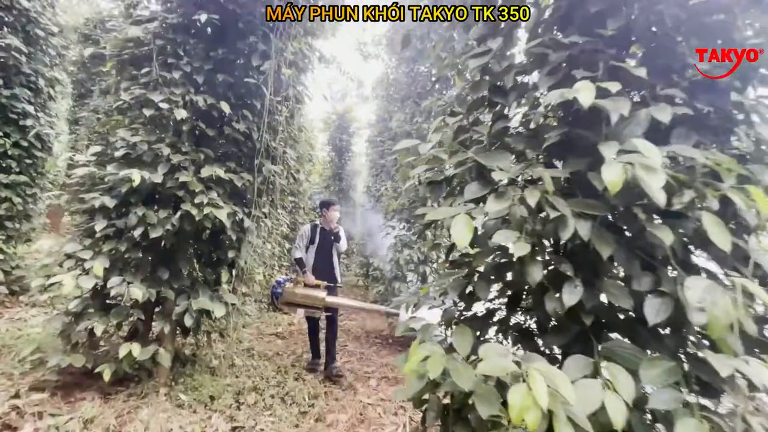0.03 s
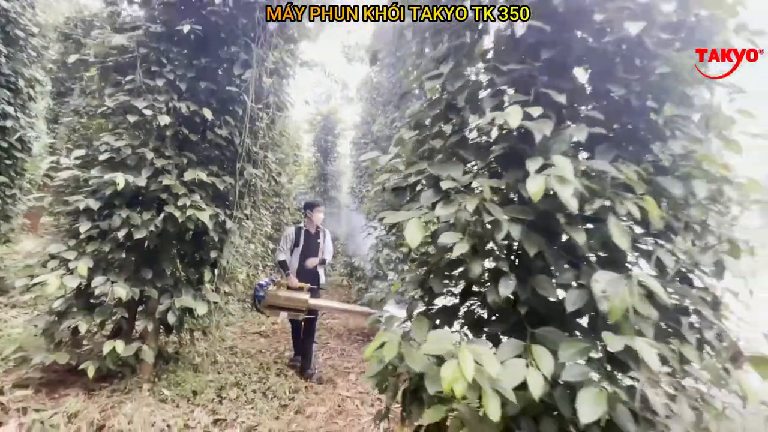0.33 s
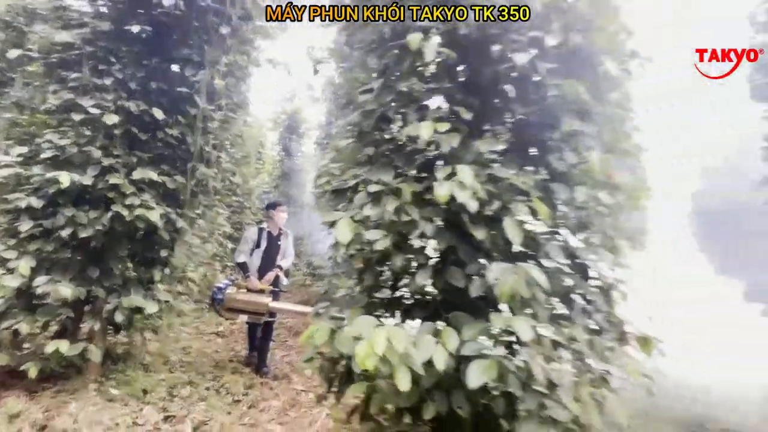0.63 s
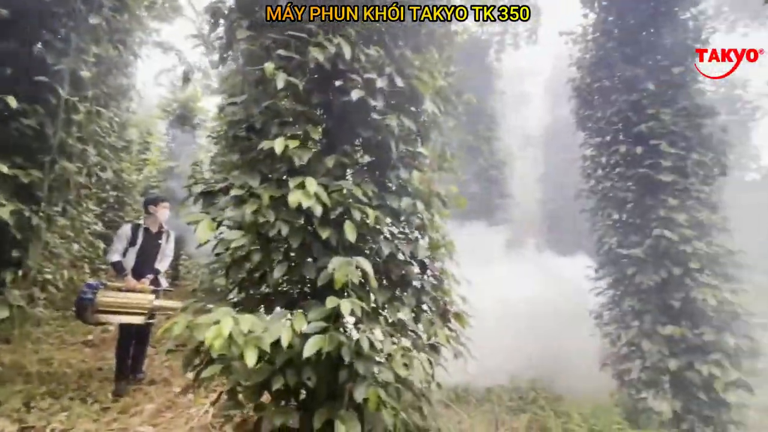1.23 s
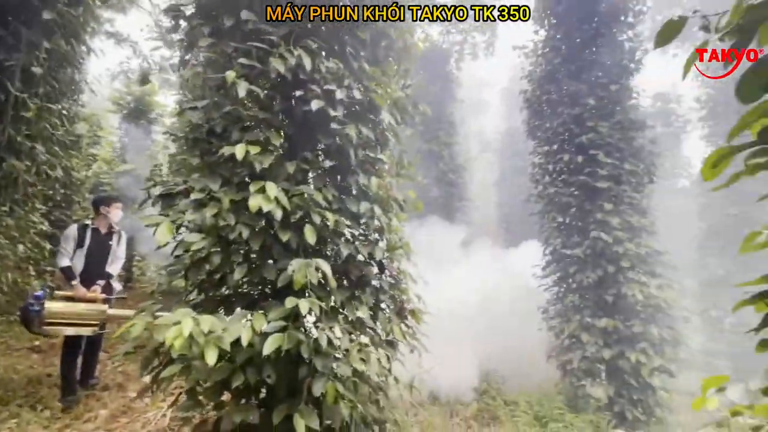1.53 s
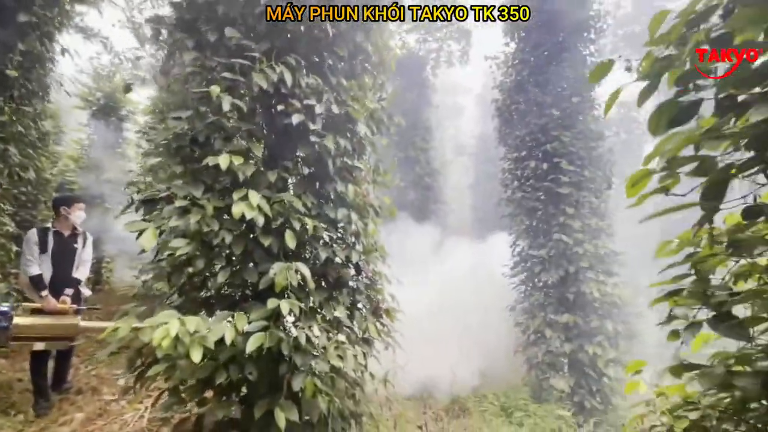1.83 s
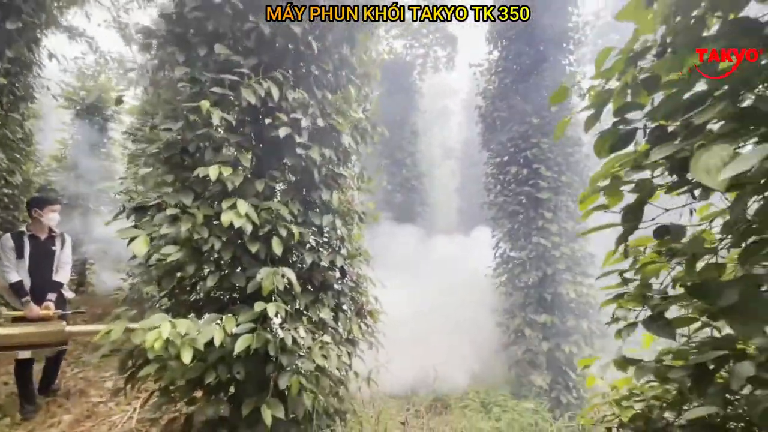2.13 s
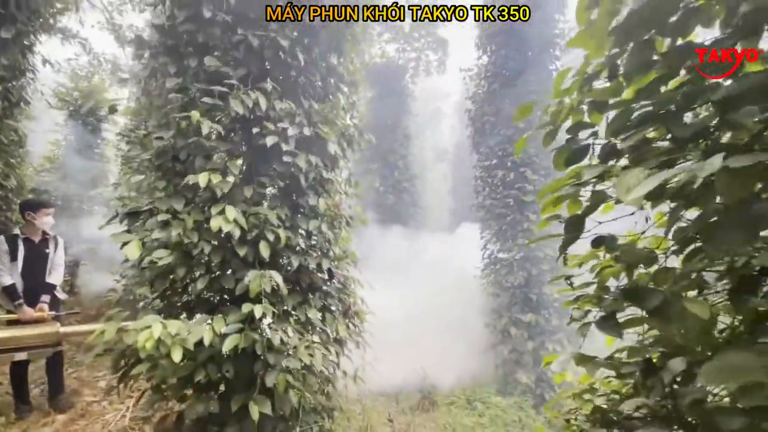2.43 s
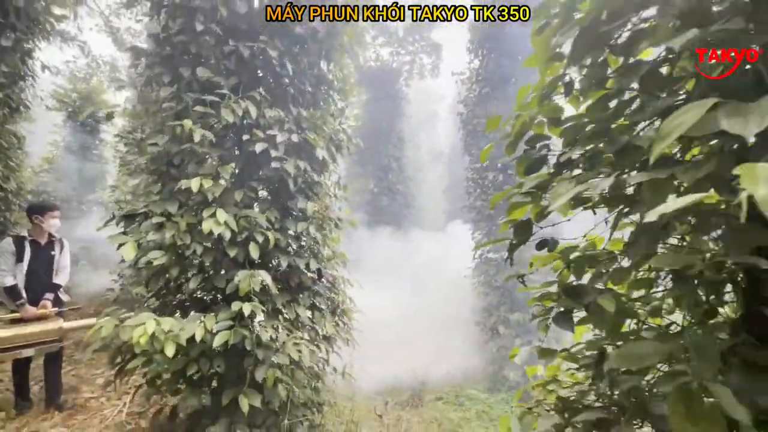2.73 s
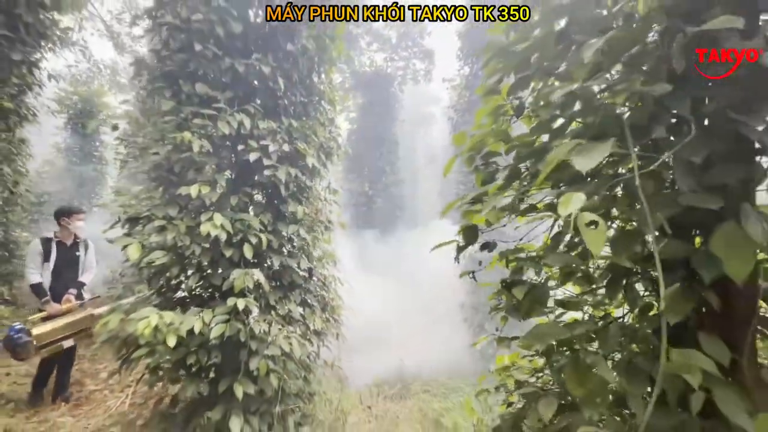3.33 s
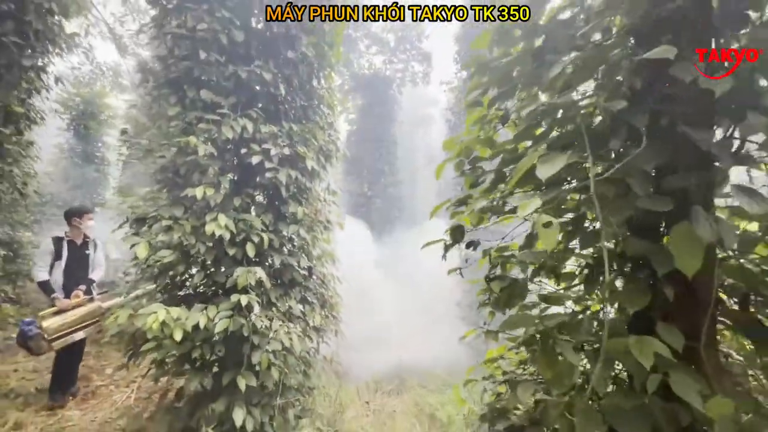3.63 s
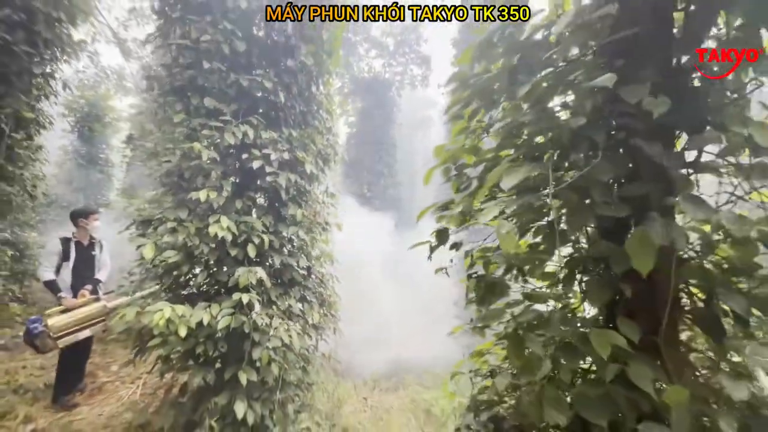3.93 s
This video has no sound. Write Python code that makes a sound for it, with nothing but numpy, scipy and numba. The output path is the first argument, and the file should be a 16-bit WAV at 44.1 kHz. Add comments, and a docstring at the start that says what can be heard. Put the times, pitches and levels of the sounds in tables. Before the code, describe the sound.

A petrol fogging machine drones without a break a few metres away, outdoors among tall plants. Its low, rasping buzz shifts in tone as the microphone moves past, with a faint hiss of spray behind it.

```python
"""Pulse-jet fogger among vines.

The machine drones a few metres away as the listener walks past. Its pipe swings at about 115 Hz.
Each firing adds a bark, a rasp of burning gas and a puff of jet noise, and rings the upper pipe modes.
Spray hisses behind. The bark changes colour as the machine turns and moves to the left."""
import sys
import numpy as np
from scipy import signal
from scipy.fft import rfft, irfft
from scipy.io import wavfile
from scipy.ndimage import uniform_filter1d, map_coordinates
from numba import njit

SR = 44100
rng = np.random.default_rng(int(sys.argv[2]) if len(sys.argv) > 2 else 0)


def waveform_to_disk(signal):
    """Save audio, clipped to [-1, 1], as 16-bit WAV at the path in sys.argv[1]."""
    frames = np.transpose(np.atleast_2d(signal))
    scaled = np.clip(frames, -1, 1) * 32767
    samples = np.round(scaled).astype(np.int16)
    wavfile.write(sys.argv[1], SR, samples)


N = 176400

# Firing rate. Each row: time in seconds, rate in Hz.
FIRING_HZ = [(0, 115.6), (.28, 115.4), (.38, 114.7), (.6, 115), (.97, 114), (1.25, 113.4), (1.38, 115.2),
             (1.9, 113.1), (2.08, 116), (2.18, 114.4), (2.25, 116.9), (2.44, 113.9), (2.56, 114.2),
             (2.68, 116.8), (3.25, 116.2), (3.37, 117.9), (3.5, 116.4), (4, 117.3)]
# Source levels. Each row: time in seconds, then pipe tone, bark and jet gains in dB.
LEVELS_DB = [(0, -9.5, -7, 2), (.35, -11, -7, 2.5), (.75, -10.5, -8, 1), (1.2, -11.5, -2.5, 1.5),
             (1.75, -11.5, 1.5, 0.5), (2.3, -12.5, 0.5, 0.3), (2.8, -12.5, 3, -0.5), (3.3, -14.5, 0.3, -1),
             (4, -14.5, 2.5, -1.5)]
# Right-ear lag of tone and bark. Each row: time in seconds, delay in ms.
EAR_LAG_MS = [(0, 0.052), (.7, 0.17), (1.3, 0.44), (2.2, 0.44), (4, 0.54)]
# Balance of jet and modes. Each row: time in seconds, left minus right in dB.
PAN_DB = [(0, -2), (.7, -1), (1.3, 1), (2, 0.5), (2.6, 0.5), (3.2, 0.5), (4, -0.5)]
# Ground echo. Each row: time in seconds, delay in ms.
GROUND_MS = [(0, 1.55), (.8, 1.09), (1.2, 1.27), (1.9, 1.06), (2.25, 1.2), (2.6, 1.13), (2.85, 1.536),
             (4, 1.28)]

# Spray and jet spectra. Each row: frequency in Hz, left and right gains in dB.
SPRAY_DB = [(30, -105, -105), (1510, -81.5, -80), (4050, -83.5, -97), (4840, -77, -105), (6800, -80, -109),
            (7800, -85, -88), (9100, -103, -106), (13000, -120, -120)]
JET_DB = [(30, -105, -105), (254, -77.5, -85.5), (434, -57.5, -57.5), (492, -66, -77.5),
          (894, -60.5, -64.5), (1230, -66, -66.5), (1340, -73, -79.5), (2110, -69.5, -69.5),
          (3040, -74, -81.5), (4020, -80, -83.5), (6000, -94, -86.5), (8800, -91, -102),
          (10400, -112, -114)]
# Top hiss, pipe rumble and bark spectra. Each row: frequency in Hz, gain in dB.
SIZZLE_DB = [(6000, -115), (8200, -90), (9300, -81.5), (10600, -82.5), (11600, -82.5), (12500, -101),
             (13500, -110)]
RUMBLE_DB = [(20, -82), (45, -97), (56, -92), (67, -54.5), (80, -84), (100, -59.5), (135, -58.5),
             (160, -62.5), (190, -70), (300, -73.5), (600, -111)]
BARK_DB = [(30, -90), (100, -66), (170, -24), (230, -29.5), (290, -52), (345, -36.5), (455, -20),
           (515, -26.5), (580, -15.5), (695, -18.5), (810, -22), (920, -33), (1040, -35.5), (1300, -41.5),
           (1420, -43.5), (1850, -62), (3000, -72.5), (6000, -95)]
# Bark colour at the right ear. Each row: frequency in Hz, gain over the left in dB.
SHADE_DB = [(230, -0.5), (350, 3.5), (460, -2), (580, -7.5), (700, -9.5), (810, -7), (920, 1), (1100, -10),
            (1800, 4.5), (4000, 6.5)]

# Upper pipe modes. Each row: centre in Hz, nominal width in Hz, left and right gains in dB.
PIPE_MODES_HZ_DB = [(1241, 93, -56.5, -66), (1524, 68, -62.5, -63), (1812, 68, -63, -65),
                    (2112, 39, -59.5, -68.5), (2433, 43, -72, -64), (2696, 52, -71, -70),
                    (3280, 230, -79, -80)]
# All modes together. Each row: time in seconds, gain in dB.
RING_DB = [(0, -1), (.35, 4.5), (.75, 7), (1.3, 1), (1.7, -3.5), (2.45, -1.5), (2.8, -4.5), (4, -4)]
# Rasp resonance. Each row: time in seconds, centre in Hz, level in dB.
RASP_HZ_DB = [(0, 694, -24), (.5, 708, -24), (1, 710, -23), (1.4, 746.2, -28), (1.9, 788.8, -27),
              (2.5, 726, -32), (2.95, 614, -27.5), (3.5, 627, -25.5), (4, 634, -26)]
# Harder firings. Each row: time in seconds, rasp boost in dB.
SPITS_DB = [(.406, 11.5), (.44, 2), (.48, 8)]

# Swelling and fading bands, named by centre in Hz. Each row: time in seconds, gain in dB.
RING_2030_DB = [(0, 1), (.2, 5), (.55, -6), (1, -11), (1.8, -1), (2.5, 3), (2.9, 2), (3.3, 0.5), (3.7, 8),
                (4, 8)]
JET_1960_DB = [(0, 3.5), (.3, 2), (.7, 6), (1.2, 0), (1.9, -4), (2.4, 1), (3, -1), (4, 1.5)]
NASAL_1220_DB = [(0, -0.5), (1, -1), (1.45, -3), (1.68, 6.5), (1.8, 4), (2, 3), (2.52, 0.5), (2.6, -10),
                 (3.1, 4), (3.3, 0), (4, 0)]
NASAL_1590_DB = [(0, 0), (.7, -1.5), (1.45, 1.5), (1.65, 7), (2.1, 5.5), (2.4, 4), (2.8, 1), (3, 7.5),
                 (3.3, 6.5), (3.65, -8), (4, 2)]
BARK_345_DB = [(0, 3), (0.7, -5), (1.1, 5), (1.7, 1), (2.5, -2), (4, -2)]
BARK_460_DB = [(0, 6), (.2, 6), (.65, -0.5), (1.2, 2.5), (1.85, -5.5), (2.15, -2), (2.6, -2.5), (3, 3),
               (3.45, -1), (3.9, 2.5)]
BARK_580_DB = [(0, 0), (.7, -1), (1.15, -4), (1.42, 0.5), (2.5, -1), (3.1, 1.5), (3.3, -2), (3.55, 1),
               (4, 2.5)]
BARK_690_DB = [(0, 2.5), (0.699, 5.5), (1, 2.5), (1.25, -11), (1.95, -33), (2.3, -11.5), (2.7, -9),
               (2.999, -13.5), (3.2, 2), (3.4, 4.5), (3.7, 0.5), (3.85, -6), (4, -0.5)]
BARK_920_DB = [(0, 8.5), (.6, 16.5), (1, 10.5), (1.4, -6), (1.8, -19), (1.95, 1), (2.5, 1.5), (2.67, -15),
               (3.02, 6), (3.3, -4), (3.8, -10), (4, -10)]
BARK_1040_DB = [(0, 12), (.6, 9), (1.5, 0), (2, 7.5), (2.45, 2), (2.65, -19), (3.05, 5.5), (3.3, 4),
                (3.7, 9.5), (4, 7.5)]
BARK_1150_DB = [(0, -5), (.8, -2.5), (1.45, 5), (1.68, 10.5), (2.52, 10.5), (2.6, 1), (4, -16)]


def undb(db):
    """Decibels to gain."""
    return 10 ** (np.asarray(db) / 20)


def curve(table, column=1):
    """Table column, linear in time."""
    rows = np.array(table, float)
    return np.interp(np.arange(N) / SR, rows[:, 0], rows[:, column])


def bin_gains(table, column=1):
    """Gain per FFT bin from a dB spectrum, on a log frequency axis."""
    rows = np.array(table, float)
    hz = np.maximum(np.arange(N + 1) * SR / (2 * N), 1)
    return undb(np.interp(np.log(hz), np.log(rows[:, 0]), rows[:, column]))


def colour(x, table, column=1):
    """Minimum-phase filter from a dB spectrum."""
    cepstrum = irfft(np.log(bin_gains(table, column)))
    cepstrum[1:N] *= 2
    cepstrum[N + 1:] = 0
    return irfft(rfft(x, 2 * N) * np.exp(rfft(cepstrum)))[:N]


def noise():
    """White noise at 0 dB per Hz."""
    return rng.standard_normal(N) * np.sqrt(SR / 2)


def wander(rate_hz):
    """Random steps, smoothed twice; unit spread."""
    hold = int(SR / rate_hz)
    steps = np.repeat(rng.standard_normal(N)[:N // hold + 1], hold)
    smooth = uniform_filter1d(uniform_filter1d(steps, hold), hold)[:N]
    return smooth / smooth.std()


def flicker(spread_db, rate_hz):
    """Random gain around unity."""
    return undb(spread_db * wander(rate_hz))


def delay(x, ms):
    """Constant or moving delay."""
    return map_coordinates(x, [np.arange(N) - ms * SR / 1000], mode="mirror")


def swell_band(x, centre_hz, table, half_width_hz):
    """Moving gain on one flat-topped band."""
    hz = np.arange(N + 1) * SR / (2 * N)
    window = np.exp(-((hz - centre_hz) / half_width_hz) ** 4)
    band = irfft(rfft(x, 2 * N) * window)[:N]
    return x + (undb(curve(table)) - 1) * band


@njit
def bandpass(x, centre_hz, width_hz):
    """State-variable band-pass with a moving centre."""
    y, band_state, low_state = np.empty(len(x)), 0., 0.
    for i in range(len(x)):
        g, damping = np.tan(np.pi * centre_hz[i] / SR), width_hz / centre_hz[i]
        band = (band_state + g * (x[i] - low_state)) / (1 + g * (g + damping))
        band_state = 2 * band - band_state
        low_state += 2 * g * band
        y[i] = damping * band
    return y


def resonance(x, centre_hz, stage_width_hz):
    """Two band-passes in series."""
    return bandpass(bandpass(x, centre_hz, stage_width_hz), centre_hz, stage_width_hz)


def gas_flow(cycles, floor=.55, decay_cycles=.25, scatter_db=1.2):
    """Flow jumps at each firing and decays towards a floor; unit rms."""
    size = undb(scatter_db * rng.standard_normal(N))[cycles.astype(int)]
    flow = floor + size * np.exp(-(cycles % 1) / decay_cycles)
    return flow / np.sqrt(np.mean(flow ** 2))


def firings(cycles, jitter_ms=.04, scatter_db=.75):
    """One slightly uneven pressure pulse per cycle; harmonics near amplitude 1."""
    position = np.interp(np.arange(1, int(cycles[-1]) + 1), cycles, np.arange(N))
    jitter, scatter = rng.standard_normal((N, 2))[:len(position)].T
    position = np.clip(position + jitter * jitter_ms * SR / 1000, 0, N - 2)
    size = undb(scatter_db * scatter) * N / cycles[-1] / 2
    sample, fraction = position.astype(int), position % 1
    return np.bincount(sample, size * (1 - fraction), N) + np.bincount(sample + 1, size * fraction, N)


def spray():
    """Flickering spray hiss, plus a thin top hiss that reaches the right ear first."""
    hiss = np.array([colour(noise(), SPRAY_DB, column) for column in (1, 2)])
    hiss *= flicker(spread_db=.8, rate_hz=20)
    sizzle = colour(noise(), SIZZLE_DB) * flicker(spread_db=.4, rate_hz=12)
    hiss += np.array([delay(sizzle, ms=.2484), sizzle])
    return hiss * undb(1.13 * curve(LEVELS_DB, column=3))  # follows the jet


def ground_echo(ears, gain_db=-15):
    """One ground reflection with a moving delay."""
    return undb(gain_db) * np.array([delay(x, curve(GROUND_MS)) for x in ears])


def pipe_ring(cycles, pulses, pulse_db=-1):
    """Firings and gas noise ring the upper pipe modes; each fades in and out a little."""
    flow, ears = gas_flow(cycles), np.zeros((2, N))
    blows = undb(pulse_db) * pulses / pulses.std() * np.sqrt(SR / 2)
    for hz, width_hz, left_db, right_db in PIPE_MODES_HZ_DB:
        common = flow * noise() + blows
        for ear, db in enumerate((left_db, right_db)):
            drive = .5 * (common + flow * noise())
            mode = resonance(drive, np.full(N, float(hz)), stage_width_hz=1.65 * width_hz)
            ears[ear] += mode * undb(db) * flicker(spread_db=.7, rate_hz=3.1)
    left, right = (swell_band(x, 2030, RING_2030_DB, half_width_hz=180) for x in ears)
    return np.array([left, delay(right, ms=.21)]) * undb(curve(RING_DB))


def jet(cycles, shared_power=.41):
    """Pulsing exhaust noise, partly scattered by leaves, so the ears share only some of it."""
    flow = gas_flow(cycles) * flicker(spread_db=.9, rate_hz=40)
    common = np.sqrt(shared_power) * noise()
    ears = [flow * (common + np.sqrt(1 - shared_power) * noise()) for _ in range(2)]
    left, right = (swell_band(x, 1960, JET_1960_DB, half_width_hz=320) for x in ears)
    left, right = colour(left, JET_DB), colour(delay(right, ms=.26), JET_DB, column=2)
    return np.array([left, right]) * undb(curve(LEVELS_DB, column=3))


def nasal(x):
    """Two nasal bands of the exhaust stand out midway, then drop back."""
    x = swell_band(x, 1220, NASAL_1220_DB, half_width_hz=106)
    return swell_band(x, 1590, NASAL_1590_DB, half_width_hz=106)


def rasp(cycles, spit_s=.00542, right_db=-1):
    """Bursts of burning gas excite a broad, wandering resonance; a few firings spit harder."""
    bursts = noise() * gas_flow(cycles, floor=.51)
    burn = resonance(bursts, curve(RASP_HZ_DB), stage_width_hz=141.)
    time_s = np.arange(N) / SR
    spit_db = sum(db * np.exp(-((time_s - at_s) / spit_s) ** 2) for at_s, db in SPITS_DB)
    left = burn / burn.std() * undb(curve(RASP_HZ_DB, column=2) + spit_db)
    return np.array([left, undb(right_db) * delay(left, ms=.4)])


def bark(pulses, crest_delay_ms=1.296):
    """Each firing leaves the pipe as a sharp, symmetric pressure crest; narrow bands swell and fade."""
    crests = irfft(rfft(pulses, 2 * N) * bin_gains(BARK_DB))[:N]
    left = delay(crests, crest_delay_ms) * undb(curve(LEVELS_DB, column=2))
    for hz, table in ((345, BARK_345_DB), (460, BARK_460_DB), (580, BARK_580_DB), (690, BARK_690_DB),
                      (920, BARK_920_DB), (1040, BARK_1040_DB), (1150, BARK_1150_DB)):
        left = swell_band(left, hz, table, half_width_hz=22)
    return np.array([left, delay(colour(left, SHADE_DB), curve(EAR_LAG_MS))])


def pipe_tone(cycles, crest_lag_cycles=.3, right_db=.28):
    """The air column swings as a near sine, cresting after each firing, over a low rumble."""
    level_db = curve(LEVELS_DB)
    swing = np.cos(2 * np.pi * (cycles - crest_lag_cycles))
    tone = swing * undb(level_db) * flicker(spread_db=.06, rate_hz=26.4)
    rumble = colour(noise(), RUMBLE_DB) * undb(level_db - level_db.mean())
    left = tone + rumble
    return np.array([left, undb(right_db) * delay(left, curve(EAR_LAG_MS))])


def scene():
    """One wavering firing cycle drives all but spray and rumble; the ground mirrors jet and ring."""
    rate_hz = curve(FIRING_HZ) * (1 + .008 * wander(rate_hz=85))
    cycles = np.cumsum(rate_hz) / SR
    pulses = firings(cycles)
    pan_db = np.array([curve(PAN_DB), -curve(PAN_DB)]) / 2
    combustion = (bark(pulses) + rasp(cycles)) * undb(.46 * pan_db)
    exhaust = np.array([nasal(x) for x in jet(cycles) + pipe_ring(cycles, pulses)])
    exhaust *= undb(pan_db) * flicker(spread_db=.55, rate_hz=17)
    return pipe_tone(cycles) + combustion + exhaust + ground_echo(exhaust) + spray()


def record(dry):
    """Steep low-pass on the top treble."""
    cutoff_hz = 12700
    return signal.sosfilt(signal.ellip(8, .2, 70, cutoff_hz, fs=SR, output="sos"), dry)


dry = scene()
out = record(dry)
waveform_to_disk(out)
```